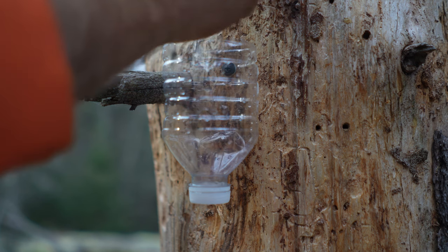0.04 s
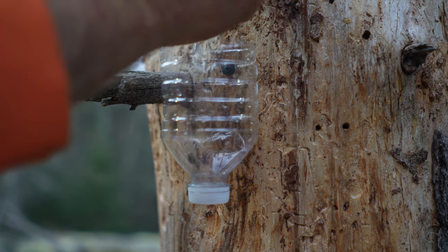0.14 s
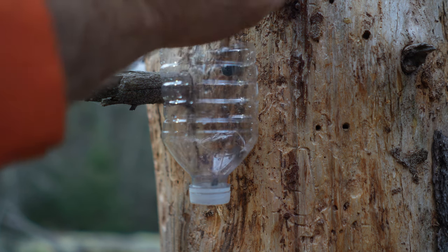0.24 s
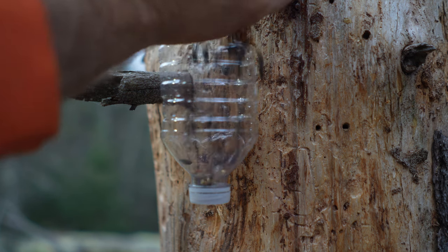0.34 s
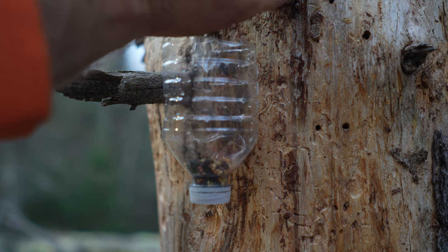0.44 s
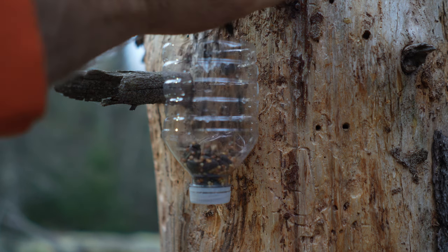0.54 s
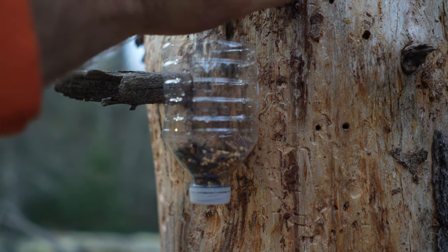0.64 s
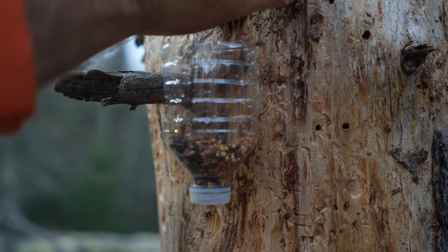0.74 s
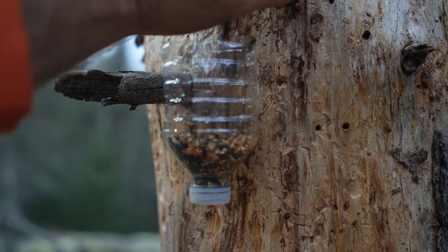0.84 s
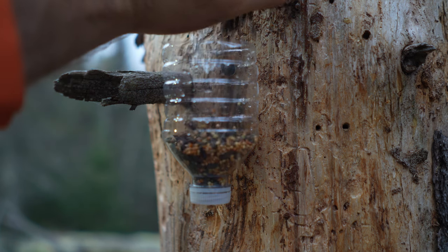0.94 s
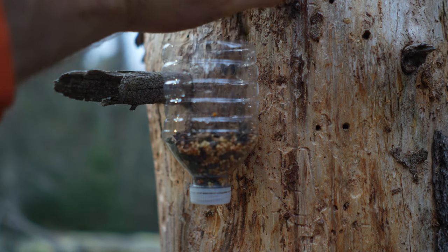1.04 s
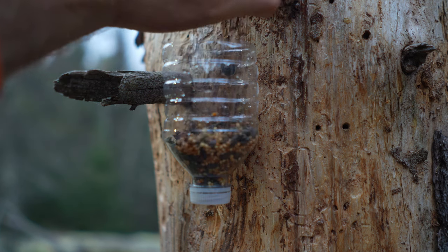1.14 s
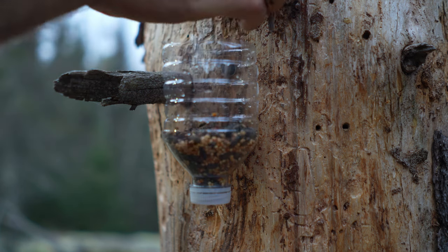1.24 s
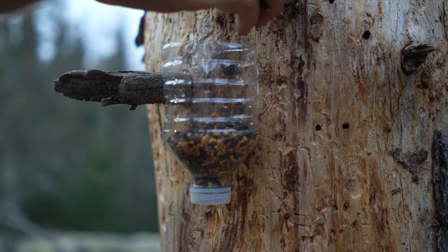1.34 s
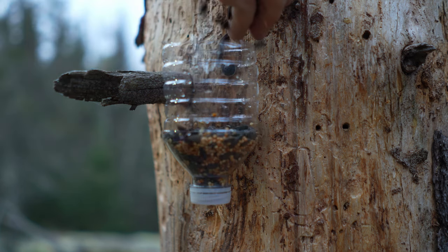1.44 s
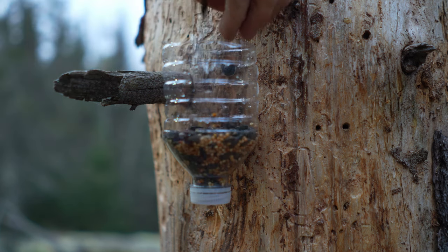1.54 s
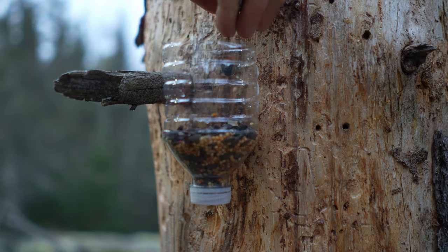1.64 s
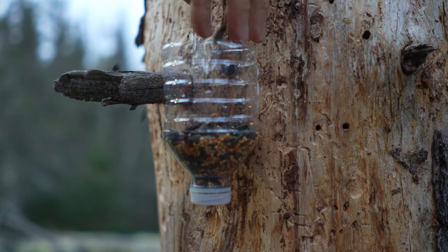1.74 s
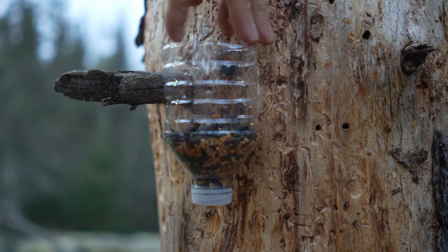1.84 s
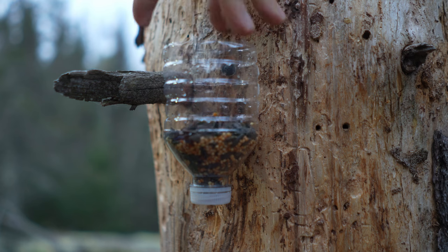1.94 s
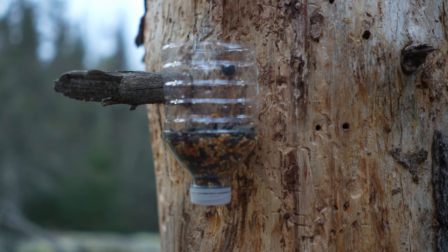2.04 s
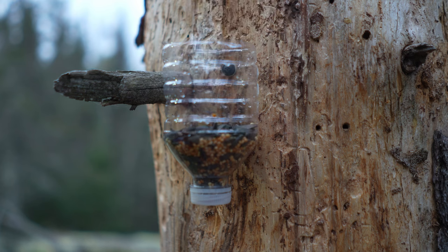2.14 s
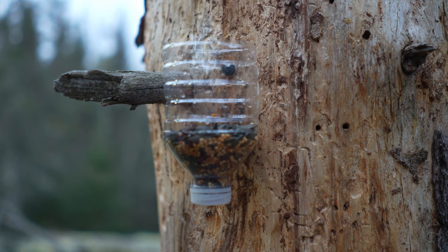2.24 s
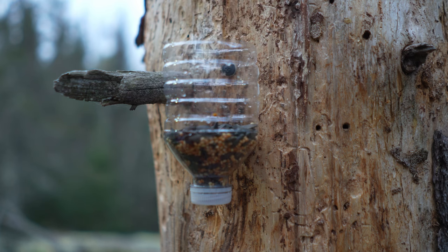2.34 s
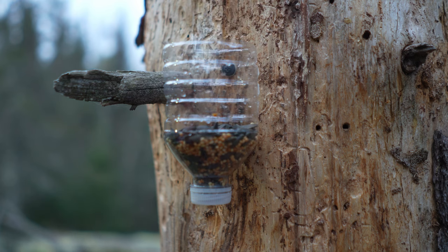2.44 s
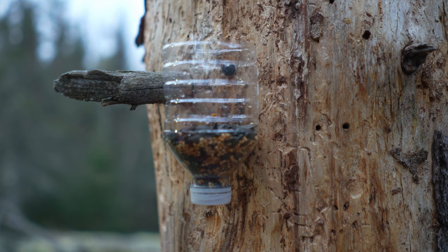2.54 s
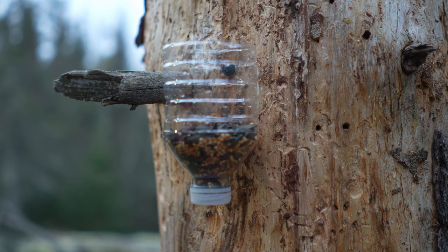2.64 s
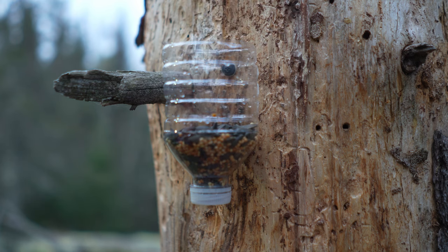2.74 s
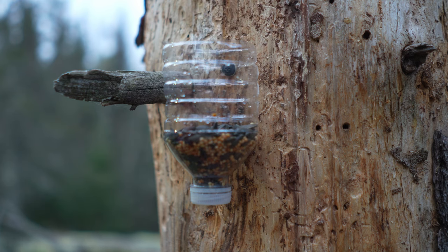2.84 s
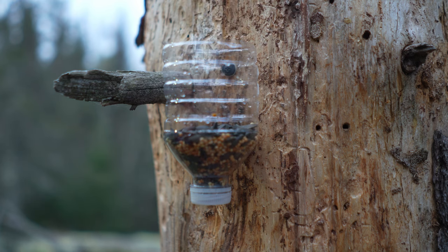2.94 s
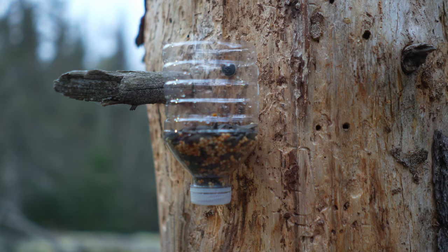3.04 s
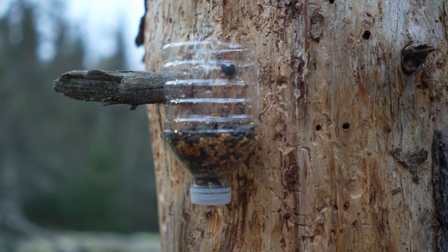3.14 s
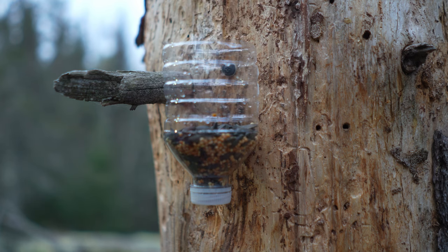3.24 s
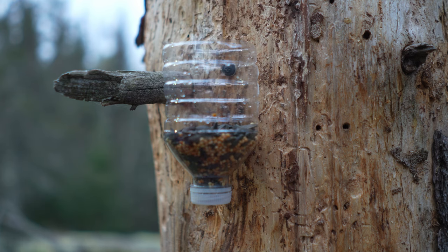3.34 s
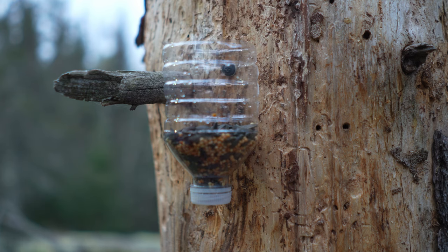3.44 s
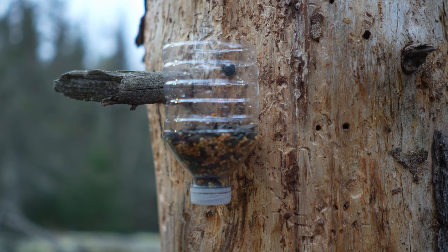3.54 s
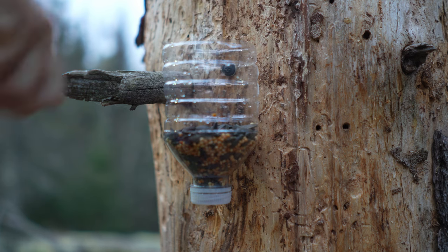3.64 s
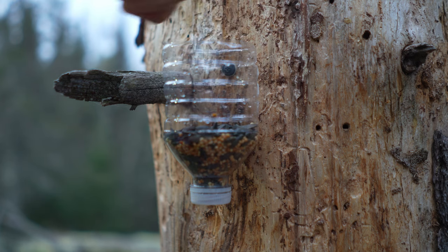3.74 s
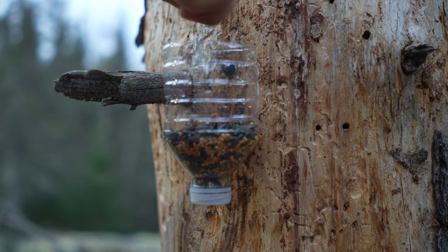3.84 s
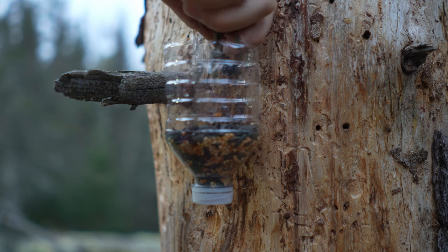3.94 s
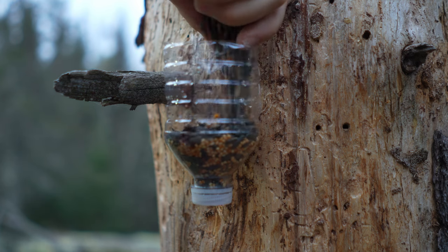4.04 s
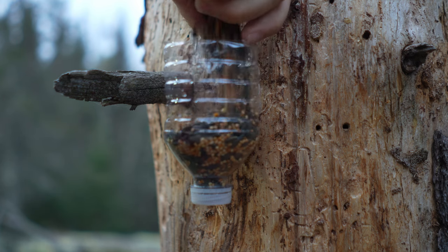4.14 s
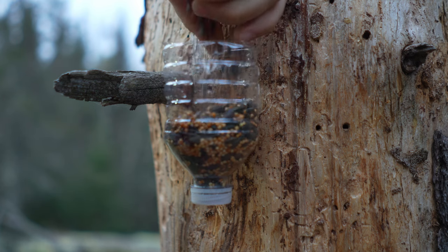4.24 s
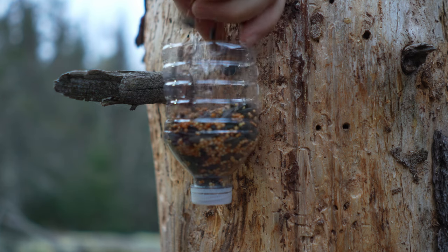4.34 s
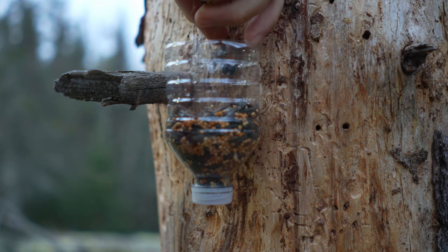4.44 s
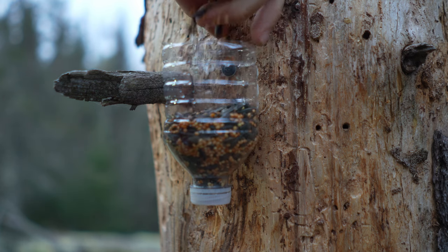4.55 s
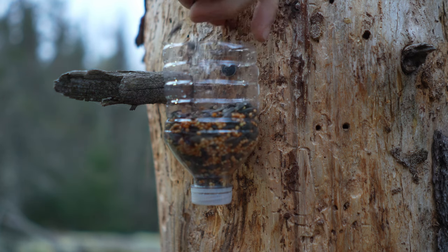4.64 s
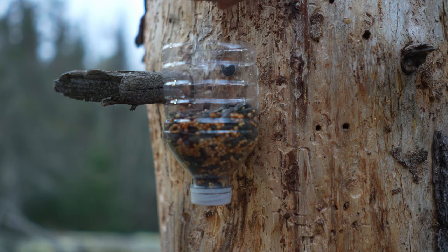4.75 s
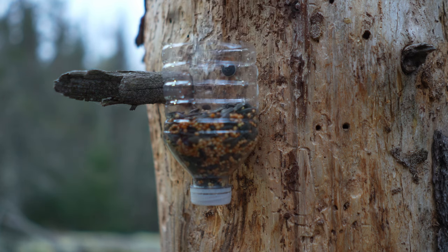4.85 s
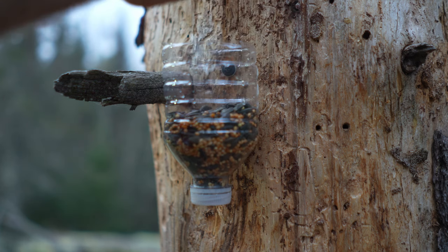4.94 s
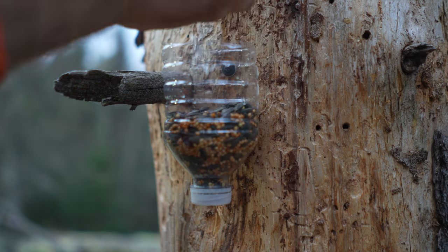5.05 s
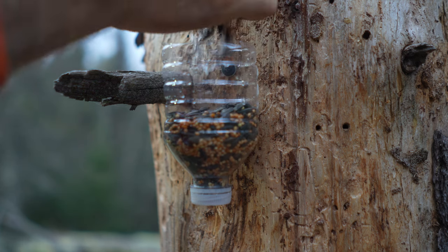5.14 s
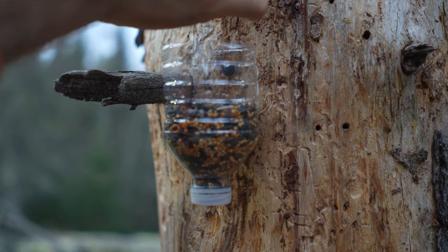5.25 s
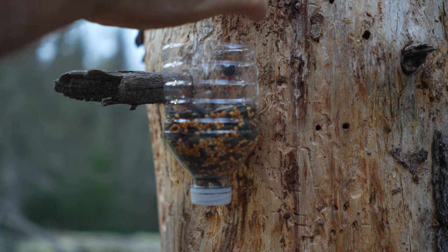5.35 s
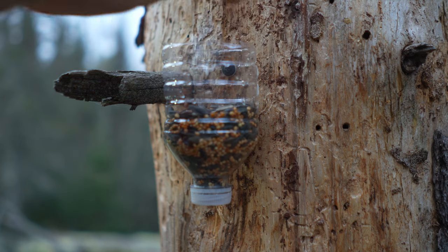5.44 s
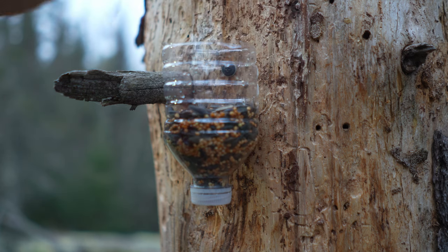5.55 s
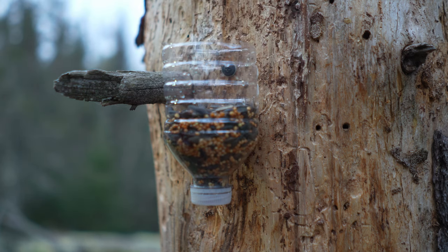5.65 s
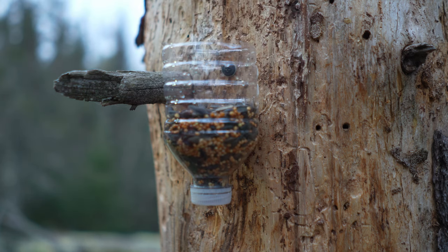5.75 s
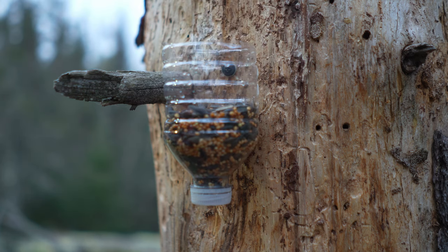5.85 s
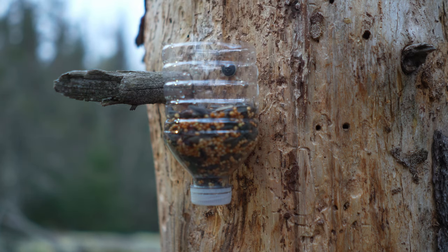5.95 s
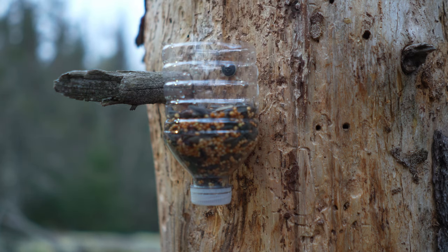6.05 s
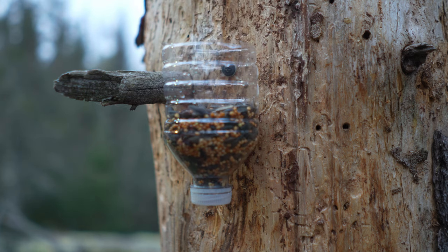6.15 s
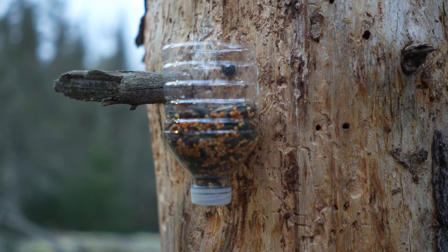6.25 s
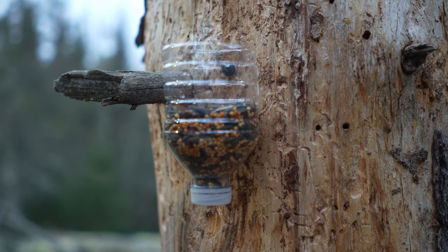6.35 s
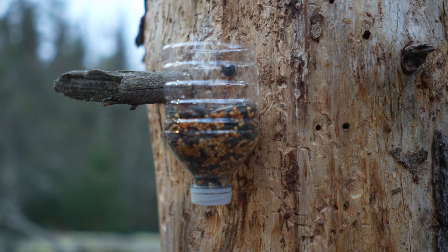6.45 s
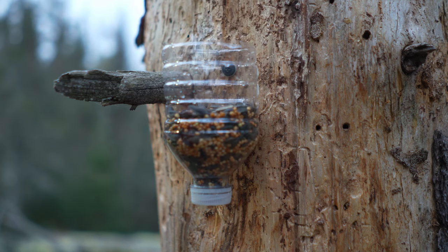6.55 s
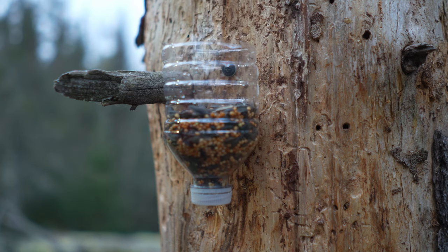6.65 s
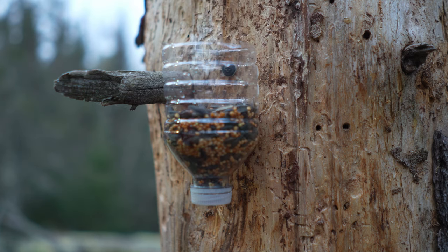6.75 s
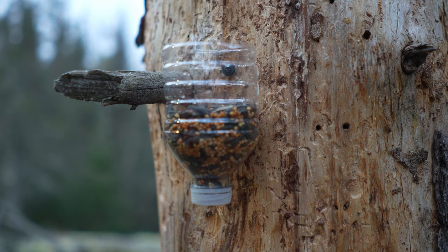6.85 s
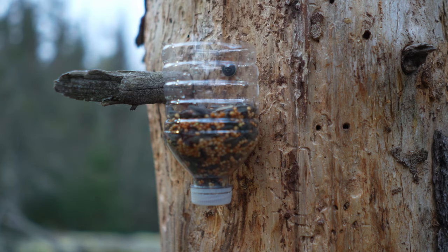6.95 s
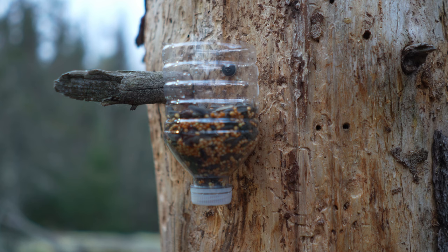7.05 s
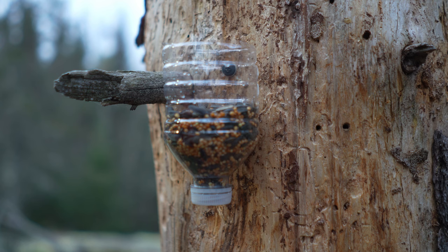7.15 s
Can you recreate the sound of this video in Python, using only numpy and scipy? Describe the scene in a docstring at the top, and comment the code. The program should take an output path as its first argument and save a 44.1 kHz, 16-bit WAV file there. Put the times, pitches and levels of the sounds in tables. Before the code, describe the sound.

Two handfuls of birdseed rush rattling into a thin plastic bottle outdoors, thinning to ticks, with soft rummaging between and dull thumps near the end.

```python
"""Birdseed poured into a thin bottle

Two handfuls of seed rush into a plastic bottle on a tree and thin out into single ticks: impulsive contacts
excite decaying noise bands and the damped modes of the wall. Between handfuls a hand rummages and sleeves
rustle (friction noise with crackles), a few dull thumps come, mostly near the end (damped sinusoids), and the
outdoors murmurs throughout (coloured noise with a narrow, swelling drone)."""
import sys
import numpy as np
from scipy import signal
from scipy.fft import rfft, irfft, next_fast_len
from scipy.io import wavfile
from scipy.ndimage import uniform_filter1d, minimum_filter1d, map_coordinates

SR = 44100
rng = np.random.default_rng(int(sys.argv[2]) if len(sys.argv) > 2 else 0)


def output_pcm(signal):
    """Save a mono or channel-first signal as 16-bit PCM at the path in sys.argv[1].

    Samples are clipped to [-1, 1] before scaling.
    """
    pcm = np.clip(np.atleast_2d(signal).T, -1, 1) * 32767
    wavfile.write(sys.argv[1], SR, np.round(pcm).astype(np.int16))


N = 317079
TIME = np.arange(N) / SR
SIZE = next_fast_len(N + 8192, True)  # transform length, padded for the filter tails
HZ = np.fft.rfftfreq(SIZE, 1 / SR)
TOP_HZ = 16050  # upper band limit

# loudest single seeds on the bottle: (time [s], relative level [dB], brightness [dB per octave])
SEEDS = [(0.009, -21, 7), (0.026, -20, -21), (0.032, -22, 5), (0.065, -23, -7.5), (0.074, -24, 7),
         (0.119, -24, -2.5), (0.142, -15.5, -1), (0.166, -19, 4), (0.172, -18, 4), (0.246, -22.5, -0.5),
         (0.315, -13, 0), (0.376, -18, 1), (0.523, -25, -3), (0.803, -19, -7), (0.921, -19.5, 0),
         (0.947, -22.5, -2), (1.038, -24, -3), (1.061, -19, -1.5), (1.067, -22.5, -2), (1.128, -22, 2),
         (1.418, -29, 3), (1.443, -27, 5), (1.48, -24.5, -0.5), (1.518, -24.5, -6.5), (1.556, -26, -10),
         (1.566, -17.5, -3), (1.63, -24.5, -1), (1.644, -22, -1.5), (1.659, -25, -3.5),
         (1.688, -26.5, -2.5), (1.72, -20, -3.5), (1.739, -22, 1), (1.787, -27.5, 1.5), (1.821, -27, -3),
         (1.84, -20, 1), (1.847, -23, -2.5), (1.854, -28, 4), (1.899, -21, -0.5), (1.935, -25.5, -4.5),
         (1.951, -31, 1), (2.017, -40.5, -1), (2.027, -42.5, 0), (3.903, -35.5, 1), (3.958, -27.5, -7.5),
         (3.996, -30, -7), (4.013, -26, -4), (4.089, -24, -2), (4.118, -21, 6), (4.143, -20.5, 2),
         (4.232, -20, 11), (4.346, -22.5, 2.5), (4.392, -21, -0.5), (4.479, -23, -5.5), (4.487, -26, -2),
         (4.53, -27, -3.5), (4.547, -26.5, 5), (4.587, -25.5, 6), (4.595, -24, -3), (4.638, -26, -1),
         (4.658, -22, -12), (4.663, -24.5, 7), (4.696, -27, 0), (4.729, -26.5, -2.5), (4.741, -24, 0),
         (4.773, -30, 3), (4.876, -30, -6.5), (4.884, -29.5, -0.5), (4.896, -31, 5), (5.0, -43, 1),
         (5.051, -36, 26), (5.161, -41, 8), (5.197, -27, 3), (5.282, -33, 1.5), (5.333, -41, -15),
         (5.414, -32, 0), (5.48, -32.5, 1), (5.496, -35, -0.5)]
# last small seeds dropping off the fingers: (start [s], length [s], level [dB])
STRAYS = [(4.92, 0.47, -51)]
# colour of seed on plastic: (frequency [Hz], relative density [dB per Hz])
RATTLE = [(200, -59), (420, -21.5), (600, -11.5), (790, -5.5), (1300, -5), (2000, 0.5), (2750, -4.5),
          (3600, 1), (6000, -1.5), (8000, -6), (10000, -9), (13500, -13), (16000, -20.5)]
# resonances of the bottle: (frequency [Hz], width [Hz], gain over the rattle [dB])
BOTTLE = [(840, 100, -11.5), (980, 38, -12.5), (1305, 86, -8.5), (1810, 200, -14.5), (3560, 100, -10.5),
          (4040, 180, -16), (5000, 170, -13), (7640, 330, -5.5)]
# left-right correlation of the seed: (frequency [Hz], correlation [0-1])
SEED_ALIKE = [(500, 0.92), (2000, 0.9), (7000, 0.82), (15000, 0.37)]
# the bottle hangs to the right: (frequency [Hz], left minus right [dB])
SEED_SIDE = [(300, 1), (700, -2.5), (2400, -5), (4400, -4.5), (8000, -10.5), (15000, -7.5)]
THINNING_BUNCH_DB = 0.2  # a thin stream breaks up into bunches more than a full one


def pouring():
    """Granular flow: more flow means more impacts, bright on the heap and duller on the resonant wall."""
    patter_db, knock_db = stream()
    flow = amp(patter_db + 22)
    # seed leaves the hand in little bunches
    clump_db = (1.26 + THINNING_BUNCH_DB * np.clip(1 - flow, 0, 1)) * wobble(55)
    patter = shower(patter_db + clump_db, 140 + 900 * flow, tilt_db=3.5, size_db=3.0, colour_db=2.0)
    knocks = shower(knock_db + clump_db - 3, 90 + 220 * flow, tilt_db=-4.5, size_db=0.5, colour_db=-1.5)
    stray_db = movements(STRAYS, axis=2, rest_db=-100)
    strays = shower(stray_db, 45, tilt_db=12.5, size_db=4.0, colour_db=7.5)
    loud = hits(SEEDS, gain_db=1.0, bounce_db=-9)
    blows = np.hstack([patter, knocks, strays, loud, companions(SEEDS, count=2)])
    seeds = contacts(*blows, SEED_ALIKE, rise=.0022, t60=.009, ring_t60=.028, ring_share=.11, scatter_db=4.5)
    bottle = causal(amp(along(RATTLE)) * (1 + resonances(BOTTLE)))
    inside = filtered(seeds, bottle) + wall_booms(reach=0.22, t60=0.033)
    side = amp(along(SEED_SIDE) * np.array([[.5], [-.5]]))
    return filtered(inside, side * lead(0, turn=0.45))


# rushes of seed from the hand: (start [s], swell [s], full flow [s], end [s], patter level [dB],
# waning [dB per s], relative knock level [dB])
POURS = [(0.0, .02, .12, .26, -35, 20, -1.5), (.21, .1, .42, 1.33, -22, 19.5, -1.5),
         (1.33, .07, .2, 2.0, -38, 28, -1), (3.985, .035, .34, 4.89, -27.5, 46, -2),
         (5.185, .016, .04, 5.46, -31, 108, -3.5)]
KNOCK_WANES = 1.38  # a thinning stream stops reaching the wall: knocks wane this much faster than the patter
SHUT_DB_PER_S = 353  # the stream dies away once the hand is empty


def stream():
    """Flow envelope: patter and knock levels [dB] swell as the hand opens, hold, then wane until it is empty."""
    power = np.full((2, N), 1e-10)
    for start, swell, hold, end, db, wane, knock_db in POURS:
        opening = np.clip((TIME - start) / swell, 0, 1)
        waned_db = wane * np.maximum(TIME - start - swell - hold, 0)
        full_db = db - SHUT_DB_PER_S * np.maximum(TIME - end, 0)
        levels_db = [full_db - waned_db, full_db + knock_db - KNOCK_WANES * waned_db]
        power += (opening * amp(levels_db)) ** 2
    return 10 * np.log10(power)


# size of the small seeds that fall along with each big one, and their spread in time
COMPANION_DB, COMPANION_SPREAD_S = -17, .009


def companions(rows, count):
    """Clustered impacts: lighter seeds land shortly before or after each loud one."""
    s, db, _ = np.transpose(rows)
    stray, size, colour = np.clip(rng.standard_normal((len(s), count, 3)), -1.5, 1.5).T
    times = s + COMPANION_SPREAD_S * (stray + .4)
    energy = amp(db + COMPANION_DB + 2.2 * size) ** 2 * SR / 200
    tilt_db = 1.7 + 3 * colour
    return np.array([times.ravel(), energy.ravel(), tilt_db.ravel()])


# heavy clumps that make the wall boom: (time [s], relative level [dB], frequency around which it is driven [Hz])
CLUMPS = [(0.024, -20, 1090), (.065, -16, 1750), (.142, -9.5, 3770), (.246, -14, 4250), (.29, -15.5, 1900),
          (.315, -11, 4100), (.529, -8, 1060), (.555, -12.5, 1010), (.585, -10.5, 1020), (.657, -6.5, 1020),
          (.689, -13.5, 836), (.724, -7.5, 990), (.741, -11, 1800), (1.517, -22, 1850), (1.659, -18, 1650),
          (1.718, -17, 1310), (1.935, -20, 950), (3.959, -23, 1180), (4.48, -15.5, 1320), (4.53, -15, 820),
          (4.547, -18.5, 790), (4.657, -16, 1770), (4.884, -22, 1900)]


def wall_booms(reach, t60):
    """Modal excitation: a clump rings those modes of the wall that lie near the pitch it drives."""
    out, age = np.zeros(N + SR), TIME[:SR // 8]
    hz, _, db = np.transpose(BOTTLE)
    stretches = rng.normal(0, 0.017, (len(CLUMPS), len(hz)))  # each clump detunes the modes a little
    for (s, level_db, drive_hz), stretch in zip(CLUMPS, stretches):
        gain = amp(db) * np.exp(-(np.log(hz / drive_hz) / reach) ** 2)
        modes = np.sin(2 * np.pi * np.outer(hz * (1 + stretch), age))
        ring = gain / gain.sum() @ modes
        envelope = amp(level_db - 60 * age / t60) * (1 - np.exp(-age / 0.00084))
        out[round(s * SR):][:len(age)] += envelope * ring
    return out[:N]


BAND_HZ = np.geomspace(500, 16000, 11)  # centres of the bands of a contact


def contacts(times, energy, tilt_db, alike, rise, t60, ring_t60, ring_share, scatter_db):
    """Impact radiation: each contact snaps, then rings briefly; low bands ring longer and take more of the ring."""
    octave = np.clip(np.log2(BAND_HZ / 3900), -1.5, 1.5)
    slope = tilt_db[:, None] * octave
    colour = amp(slope + scatter_db * rng.standard_normal(slope.shape)) ** 2
    weight = np.minimum(BAND_HZ, 4000)
    colour /= np.average(colour, axis=1, weights=weight)[:, None]
    at = np.clip(times * SR, 0, N - 1).astype(int)
    hiss, out = pair(alike), 0
    for hz, share, pick in zip(BAND_HZ, colour.T, np.eye(len(BAND_HZ))):
        slow = (hz / 4000) ** -.45  # the given times and ring share hold at 4 kHz
        blows = fade(np.bincount(at, energy * share, N), rise * slow)  # the surface takes a moment to get going
        ring = np.clip(ring_share * slow, 0, 1)
        power = (1 - ring) * fade(blows, t60 * slow) + ring * fade(blows, ring_t60 * slow)
        band = irfft(hiss * along(np.c_[BAND_HZ, pick]), SIZE)[:, :N]
        out = out + np.sqrt(np.abs(power)) * band
    return out


def hits(rows, gain_db, bounce_db):
    """Rebound: times, energies and brightness of single contacts, each followed by a lighter bounce."""
    s, db, tilt_db = np.transpose(rows)
    energy = amp(db + gain_db) ** 2 * SR / 200
    flight = rng.uniform(.002, .008, len(s))  # seconds until the bounce
    return np.hstack([[s, energy, tilt_db], [s + flight, energy * amp(bounce_db) ** 2, tilt_db]])


def shower(level_db, rate, tilt_db, size_db, colour_db):
    """Shot noise: contacts at an uneven rate per second add up to a level; size and brightness scatter."""
    rate = np.broadcast_to(rate, N)
    passed = np.cumsum(rate) / SR
    size, colour, early = np.clip(rng.standard_normal((int(passed[-1]), 3)), -2, 2).T
    at = np.minimum(np.searchsorted(passed, np.arange(len(size)) + early), N - 1)
    energy = unit(amp(size_db * size)) ** 2 * amp(level_db[at]) ** 2 * SR / rate[at]
    return np.array([at / SR, energy, tilt_db + colour_db * colour])


# crackles of the rummaging hand: (time [s], relative level [dB], brightness [dB per octave])
CRACKLES = [(2.247, -27, 6.5), (2.349, -39, -4), (2.354, -31, -0.5), (2.365, -30, 1.5), (2.391, -28, 10),
            (2.52, -32.5, -2.5), (2.543, -28.5, 2.5), (2.562, -27, 8), (2.655, -36.5, 0), (2.824, -30, 10),
            (3.474, -41, -19), (3.538, -33, -1), (3.6, -37.5, -0.5), (3.677, -42.5, -2.5), (5.729, -33, 0),
            (5.75, -31, 6), (5.828, -27.5, 6), (5.841, -35.5, -3), (5.885, -40, -2.5), (5.956, -37, -0.5),
            (6.695, -31.5, -3.5), (6.709, -40, -10)]
# strokes of hand and sleeve: (start [s], length [s], relative rub level [dB], swish level [dB],
# relative low scuff level [dB], brightness of the swish [dB])
STROKES = [(2.342, 0.012, -37.5, -41, -54, 6), (2.383, 0.039, -36, -43, -58, 4),
           (2.43, 0.13, -44, -52, -65, -2), (2.52, 0.055, -32.5, -43, -38, -3),
           (2.568, 0.13, -45, -61, -53, 1), (2.728, .11, -40, -51, -45, 5),
           (2.855, 0.38, -49, -55, -53, -2), (3.271, 0.21, -44.5, -48.5, -53.5, 6),
           (3.46, 0.12, -49.5, -60, -56, 2), (5.714, 0.049, -39, -46, -43, -3),
           (5.779, 0.052, -35.5, -41.5, -42, -9), (5.844, 0.091, -43.5, -59, -51, 0),
           (5.935, 0.066, -41.5, -53, -46, -2), (6.03, .27, -61, -66, -63, 2),
           (6.3, 0.065, -44, -46.5, -53, 3), (6.36, 0.078, -43, -43.5, -57, 3.5),
           (6.511, 0.044, -37, -48, -38.5, 0), (6.563, 0.13, -45, -56, -47, -5),
           (6.737, 0.19, -46.5, -55, -51, -5), (6.69, 0.033, -41.5, -49, -38, 2),
           (6.93, .24, -44.5, -50, -46.5, -11), (7.157, .03, -36, -47, -41, -7)]
# hollow scrapes of the hand: (start [s], length [s], level [dB])
SCRAPES = [(2.395, 0.044, -34.5), (6.3, .13, -47.5)]
# their resonances: (frequency [Hz], width [Hz], relative gain [dB])
HOLLOW = [(990, 220, -1), (1340, 570, -8), (1880, 190, 3), (3550, 150, -10)]
# colours of crackle, rub and low scuff: (frequency [Hz], relative density [dB per Hz])
CRINKLE = [(100, -17), (300, -1.5), (1000, -2), (2200, -0.5), (4000, -3), (8000, -9), (12500, -12),
           (16000, -22)]
RUB = [(250, -22), (600, -6), (1000, -3), (1400, -3.5), (2000, -2), (3500, -6), (6000, -12), (12000, -46)]
SCUFF = [(80, -5), (200, -4.5), (330, -4.5), (480, -5), (900, -33.5)]
# left-right correlation of hand and bumps: (frequency [Hz], correlation [0-1])
HAND_ALIKE = [(60, 1), (300, 0.96), (1500, 0.99), (5000, 0.69), (14000, 0.22)]


def rummaging():
    """Stick-slip friction: light strokes of hand and cloth swish smoothly, hard ones catch and crackle."""
    rub_db = movements(STROKES, axis=2, rest_db=-100)
    scuff_db = movements(STROKES, axis=4, rest_db=-100)
    scrape_db = movements(SCRAPES, axis=2, rest_db=-100)
    pressure = np.clip(amp(rub_db + 40.5), 0, 1)
    grains = shower(rub_db - 12.5 + 10 * pressure, 150, tilt_db=-.5, size_db=4.0, colour_db=0.5)
    blows = np.hstack([grains, hits(CRACKLES, gain_db=2.5, bounce_db=-8.0)])
    snaps = contacts(*blows, HAND_ALIKE, rise=.0008, t60=.005, ring_t60=.025, ring_share=.15, scatter_db=3)
    crackle = filtered(snaps, causal(amp(along(CRINKLE))))
    grip_db = (0.99 + 1.7 * pressure) * wobble(110)  # the cloth catches and slips
    rub = amp(rub_db - 3 + grip_db) * noise(RUB, HAND_ALIKE)
    swish = amp(grip_db) * sliding()
    scuff = amp(scuff_db - 2.0 + 1.7 * wobble(60)) * noise(SCUFF, HAND_ALIKE)
    hollow = unit(irfft(pair(HAND_ALIKE) * resonances(HOLLOW), SIZE)[:, :N])
    scrape = amp(scrape_db + grip_db) * hollow
    return (crackle + rub + swish + scuff + scrape) * amp([[.3], [-.3]])  # slightly to the left


# smooth cloth sliding: (frequency [Hz], relative density [dB per Hz])
SWISH = [(1500, -33), (4000, 3), (6200, 2.5), (7800, -5.5), (9600, 0), (12500, -4.5), (16000, -9)]
SWISH_PIVOT_HZ = 8800  # a bright swish favours what lies above this, a dull one what lies below


def sliding():
    """Friction noise: a bright stroke tips the swish toward the treble, a dull one toward the upper mids."""
    start, length, _, db, _, bright_db = np.transpose(STROKES)
    cloth = noise(SWISH, HAND_ALIKE)
    treble = filtered(cloth, 1 - 1 / (1 + (HZ / SWISH_PIVOT_HZ) ** 8))

    def level(row_db):
        """Superposition: gain of all strokes at these levels."""
        return amp(movements(np.c_[start, length, row_db], axis=2, rest_db=-100))

    return level(db + bright_db / 2) * treble + level(db - bright_db / 2) * (cloth - treble)


STROKE_ATTACK_S, STROKE_RELEASE_DB_PER_S = 0.018, 280  # every movement sets in, holds and lets go alike


def movements(rows, axis, rest_db):
    """Energy summation: level [dB] of (start, length, ..) movements; axis picks the level column."""
    power = amp(rest_db) ** 2
    for row in rows:
        age = TIME - row[0]
        attack = np.clip(age / STROKE_ATTACK_S, 0, 1)
        release_db = STROKE_RELEASE_DB_PER_S * np.maximum(age - row[1], 0)
        power = power + (attack * amp(row[axis] - release_db)) ** 2
    return 10 * np.log10(power)


# dull bumps: (time [s], relative level [dB], pitch [Hz])
THUMPS = [(2.518, -31, 258), (2.564, -32, 238), (2.626, -32, 259), (6.58, -13.5, 130), (6.607, -18, 85),
          (6.63, -20, 95), (6.647, -16.5, 108), (6.709, -25, 330), (6.91, -17.5, 103), (7.17, -23, 294)]
# nudges that set off a soft handling rumble: (start [s], length [s], level [dB])
NUDGES = [(.94, 0.068, -47), (1.22, 0.058, -47.5), (2.34, 0.21, -51.5), (3.38, .15, -59),
          (4.52, 0.071, -51), (5.73, 0.16, -49), (6.42, .14, -48), (6.56, 0.097, -32), (6.8, 0.19, -42),
          (6.95, 0.2, -46)]
# colour of the rumble: (frequency [Hz], relative density [dB per Hz])
BUMP = [(15, -20), (28, -14), (50, 0), (150, -7), (300, -18), (700, -36), (2000, -66)]


def thumps():
    """Damped oscillation: soft, heavily damped bumps over a handling rumble."""
    out = amp(movements(NUDGES, axis=2, rest_db=-80)) * noise(BUMP, HAND_ALIKE)
    for s, db, hz in THUMPS:
        age = np.maximum(TIME - s, 0)
        envelope = amp(db + 5.5 - 60 * age / 0.022) * (1 - np.exp(-age / 0.0016))
        out = out + envelope * np.sin(2 * np.pi * hz * age)
    return out


# colours of the open air and of a far-off drone: (frequency [Hz], relative density [dB per Hz])
AIR = [(15, -50), (25, -15), (170, -8), (277, -15.5), (344, -13), (451, -14.5), (641, -14.5), (695, -15.5),
       (1020, -15), (1330, -20), (2990, -28.5), (4490, -29.5), (5570, -30.5), (11600, -34), (16000, -37)]
DRONE = [(60, -47), (125, -17.5), (155, 1.5), (185, -3), (230, -14), (450, -45)]
# left-right correlation of the open air: (frequency [Hz], correlation [0-1])
AIR_ALIKE = [(100, 1), (500, 0.89), (1500, 0.61), (5000, 0.053)]
DRONE_START_DB, DRONE_DB, DRONE_SWELL_S = -63.5, -50.5, 2.9  # the drone swells, then stays


def outdoors():
    """Diffuse field: faint open-air noise with a narrow, far-off drone that slowly swells."""
    swell_db = np.interp(TIME, [0, DRONE_SWELL_S], [DRONE_START_DB, DRONE_DB])
    air = amp(-48.5 + 0.86 * wobble(3.27)) * noise(AIR, AIR_ALIKE)
    drone = amp(swell_db + 1.3 * wobble(3.9)) * noise(DRONE, AIR_ALIKE)
    return air + drone


def trees(x, t60, wet_db):
    """Reverberation: weak scatter from the trunk and the ground as an exponentially decaying noise tail."""
    tail = rng.standard_normal((2, SR // 4)) * amp(-60 * TIME[:SR // 4] / t60)
    scatter = signal.fftconvolve(x, tail / np.linalg.norm(tail[0]), axes=1)[:, :N]
    return x + amp(wet_db) * scatter


def lead(seconds, turn):
    """Channel phase: the left channel leads by a travel time and a nearly fixed phase turn [rad]."""
    phase = 2 * np.pi * HZ * seconds + turn * HZ / (HZ + 40)
    return np.exp(.5j * phase * np.array([[1], [-1]]))


def resonances(modes):
    """Resonance: summed gain of (frequency [Hz], width [Hz], gain [dB]) peaks."""
    return sum(amp(db) / (1 + (2 * (HZ - hz) / width) ** 2) for hz, width, db in modes)


def fade(energy, t60):
    """Exponential decay: spread each packet of energy over a decay of 60 dB in t60 seconds."""
    keep = np.exp(-np.log(1e6) / (abs(t60) * SR))
    return signal.lfilter([1 - keep], [1, -keep], energy)


def pair(alike):
    """Partial coherence: spectra of two partly alike white noises, as a sum and difference."""
    turn = np.arccos(np.clip(along(alike), -1, 1)) / 2
    mid, side = rfft(rng.standard_normal((2, SIZE))) * [np.cos(turn), np.sin(turn)]
    return np.array([mid + side, mid - side])


def noise(spectrum, alike):
    """Spectral shaping: coloured stereo noise of rms 1."""
    return unit(irfft(pair(alike) * amp(along(spectrum)), SIZE)[:, :N])


def causal(gain):
    """Minimum phase: the causal response with this shape and unit power, built by folding the cepstrum."""
    shape = unit(gain * np.where(HZ < TOP_HZ, 1, .1))
    cepstrum = irfft(np.log(np.maximum(shape, 1e-6)), SIZE)
    cepstrum[1:SIZE // 2] *= 2
    cepstrum[SIZE // 2 + 1:] = 0
    return np.exp(rfft(cepstrum))


def filtered(x, response):
    """Linear filtering: x through a frequency response."""
    return irfft(rfft(x, SIZE) * response, SIZE)[..., :N]


def along(points):
    """Log-frequency scale: (frequency [Hz], value) points interpolated over the spectrum."""
    f, v = np.transpose(points)
    return np.interp(np.log(HZ + 1), np.log(f + 1), v)


def wobble(rate):
    """Slow random modulation: a smooth curve with rate knots a second."""
    return map_coordinates(rng.standard_normal(int(N * rate / SR) + 4), [TIME * rate])


def amp(db):
    """Level to amplitude: decibels to gain."""
    return 10 ** (np.asarray(db) / 20)


def unit(x):
    """Effective value: scale to rms 1."""
    return x / np.sqrt(np.mean(x ** 2) + 1e-20)


def scene():
    """Superposition: the bottle to the right; hand, bumps and open air reach the left channel first."""
    around = filtered(rummaging() + thumps() + outdoors(), lead(0.0001, turn=0.31))
    return trees(pouring(), t60=.09, wet_db=-19) + around


def record(dry):
    """Peak limiting: the sharpest peaks are briefly turned down, and nothing above the band limit is kept."""
    needed = np.minimum(1, .7 / (np.abs(dry).max(axis=0) + 1e-9))
    gain = uniform_filter1d(minimum_filter1d(needed, size=45), size=45)
    return filtered(dry * gain, HZ < TOP_HZ)


dry = scene()
out = record(dry)
output_pcm(out)
```